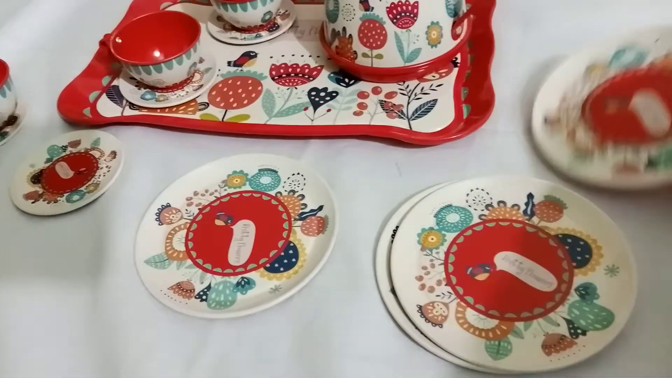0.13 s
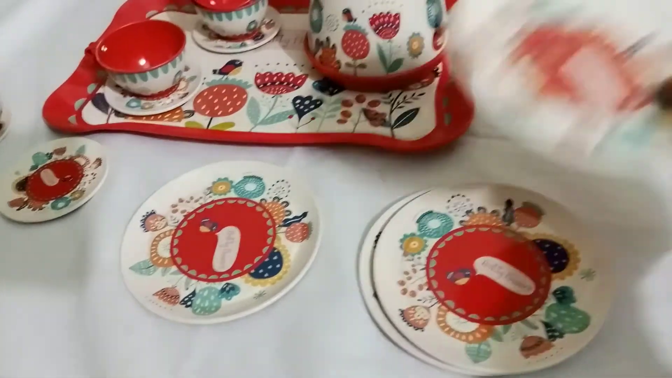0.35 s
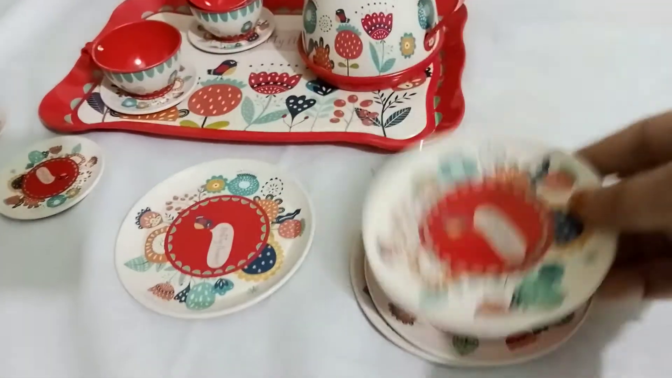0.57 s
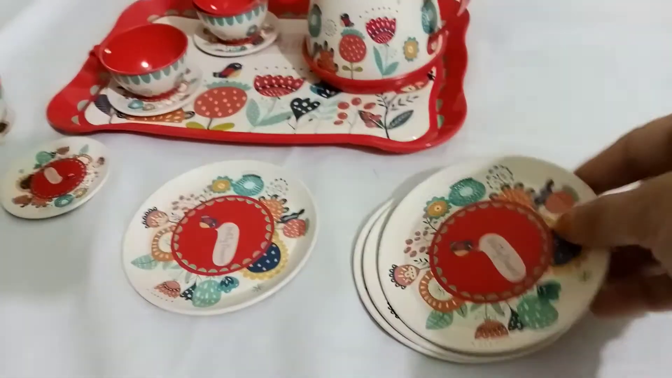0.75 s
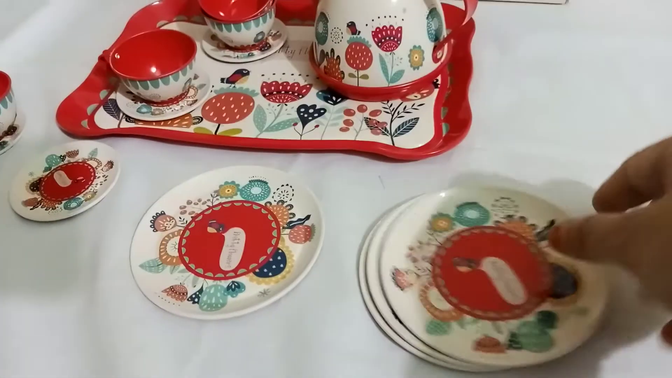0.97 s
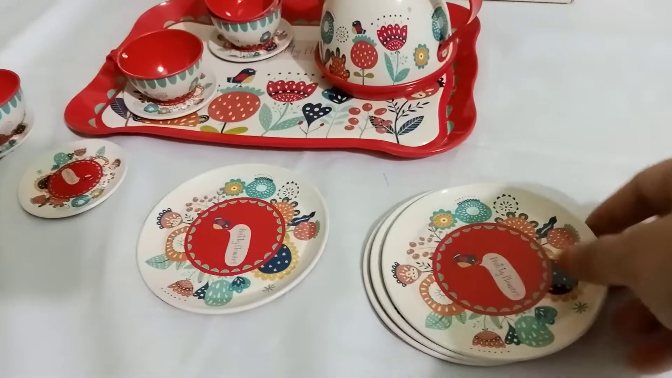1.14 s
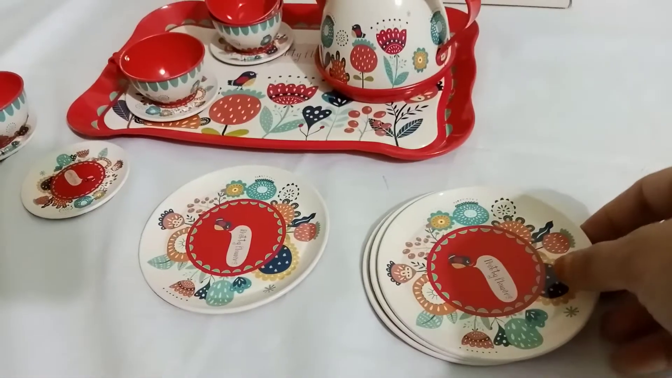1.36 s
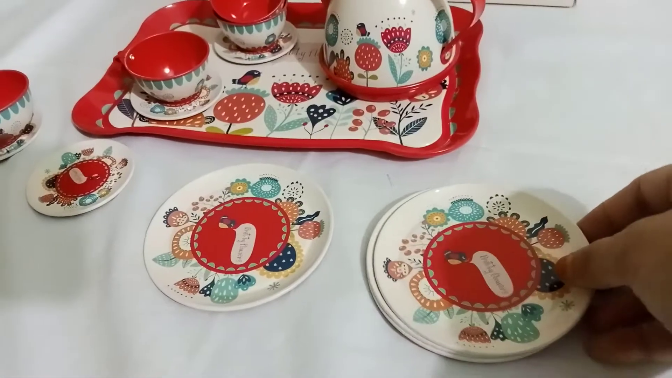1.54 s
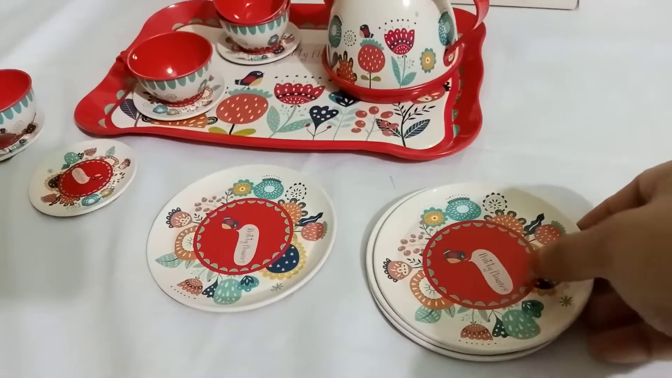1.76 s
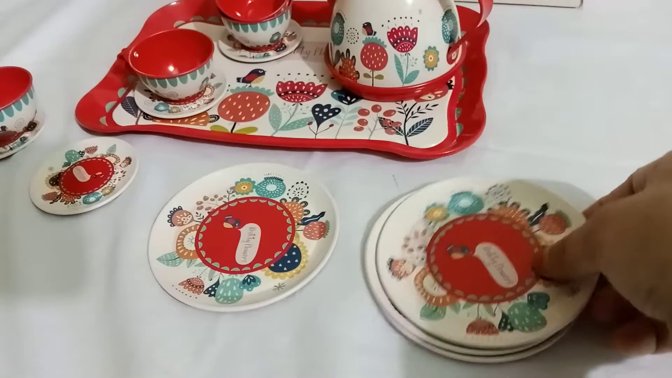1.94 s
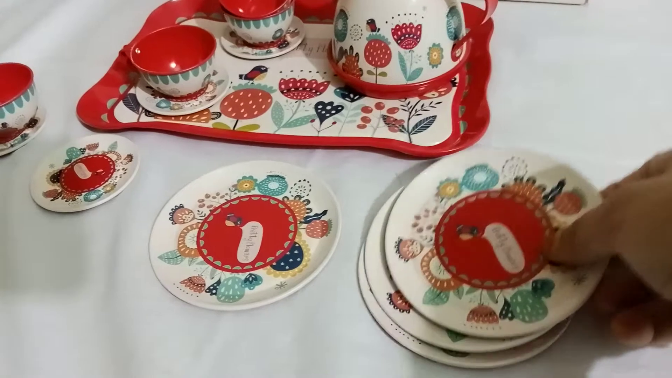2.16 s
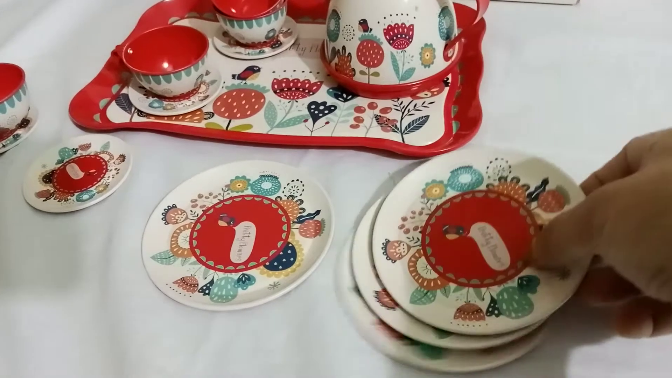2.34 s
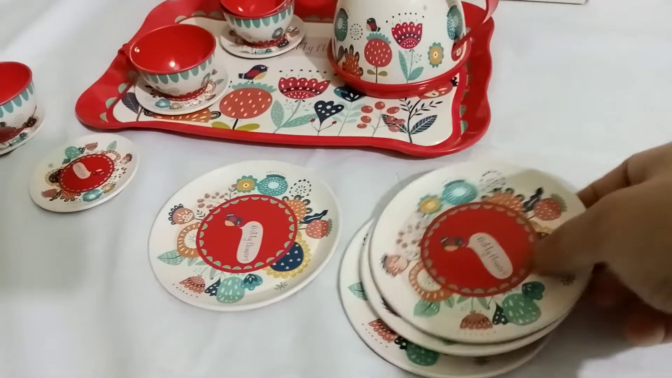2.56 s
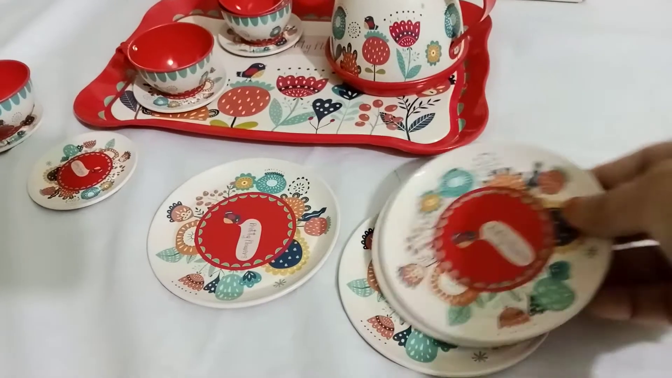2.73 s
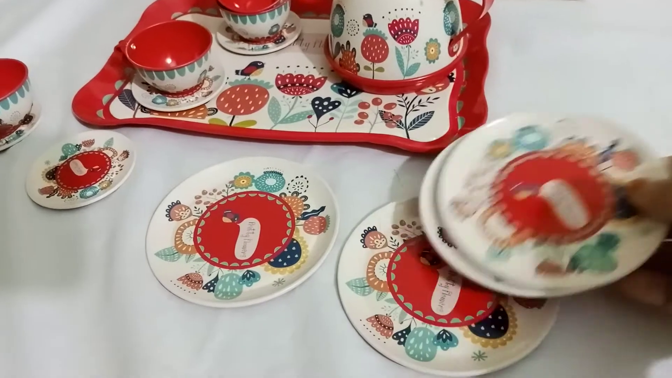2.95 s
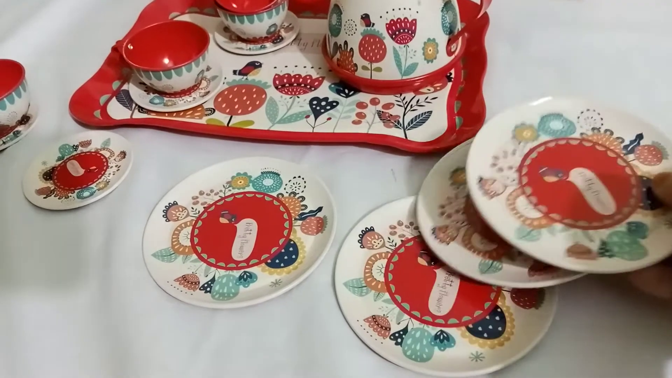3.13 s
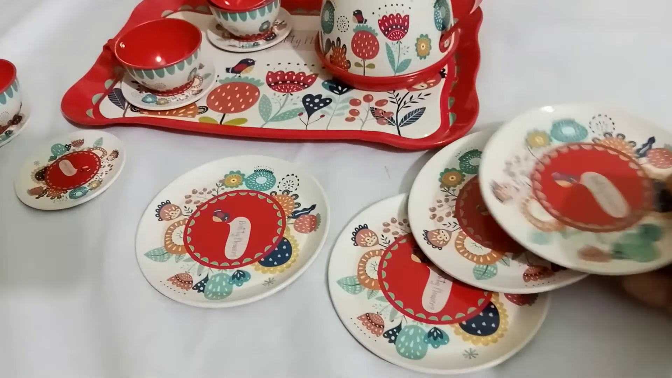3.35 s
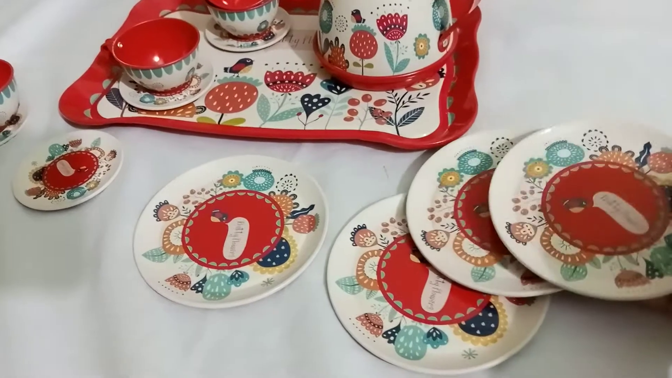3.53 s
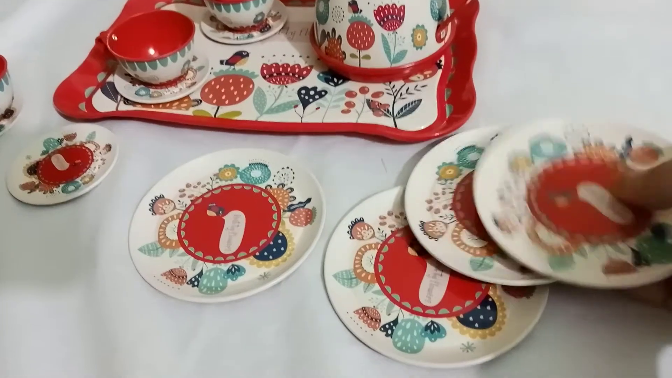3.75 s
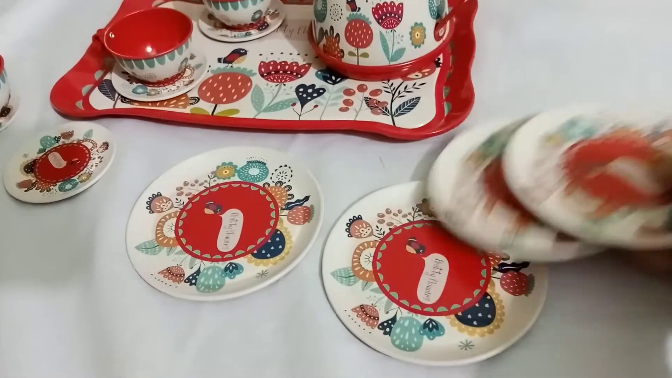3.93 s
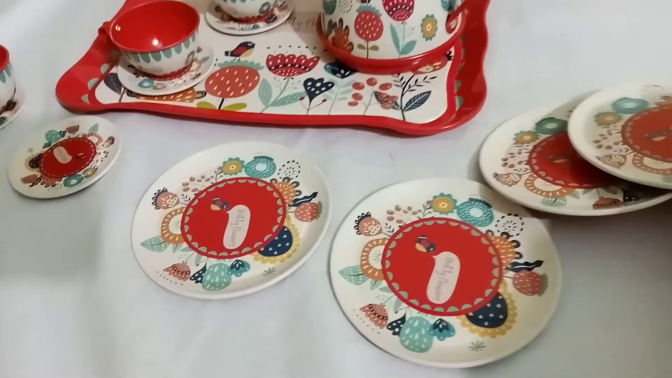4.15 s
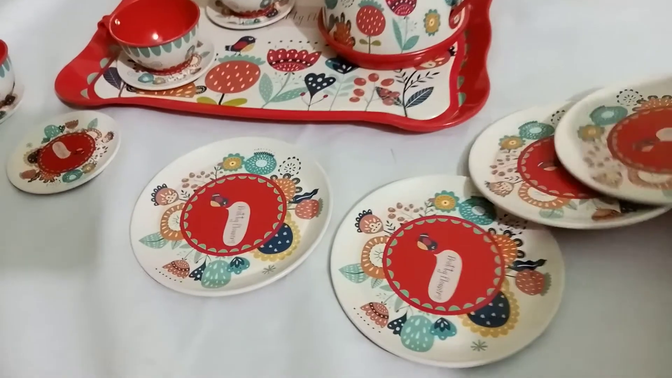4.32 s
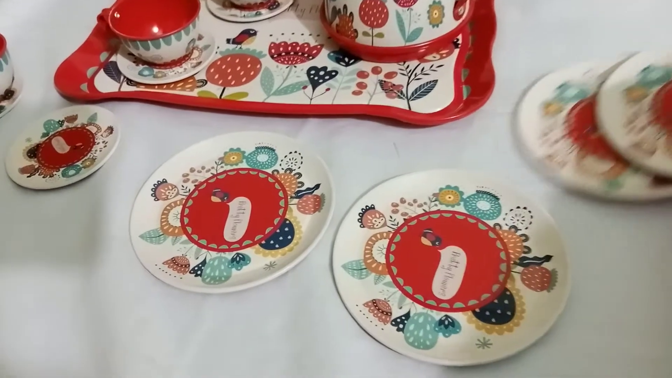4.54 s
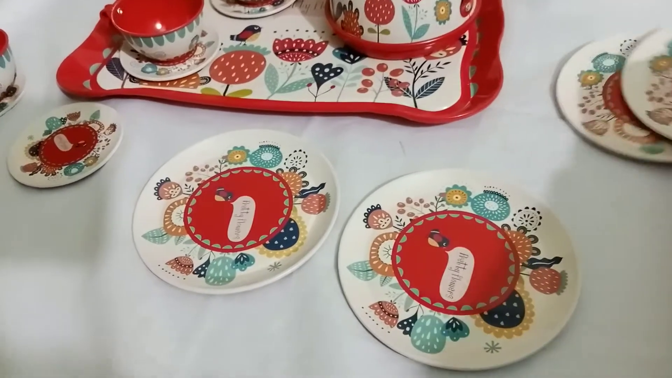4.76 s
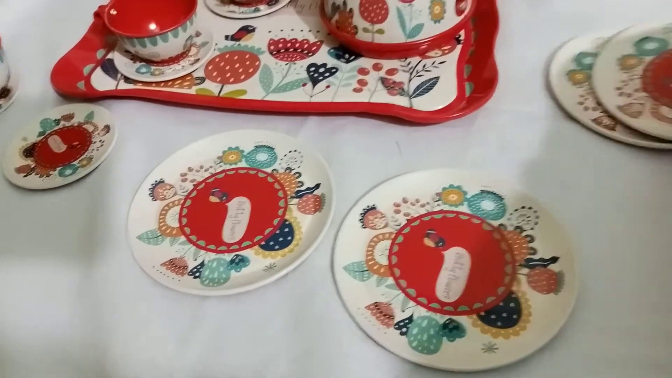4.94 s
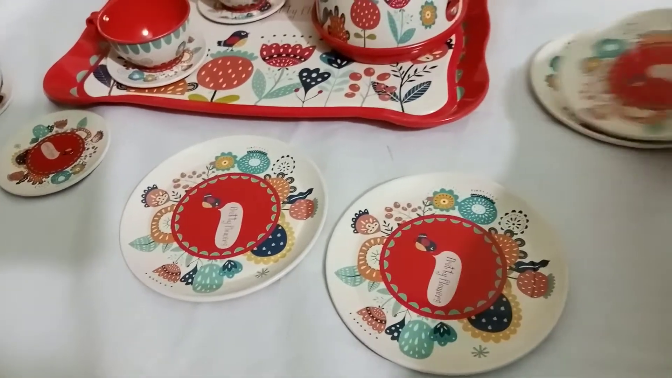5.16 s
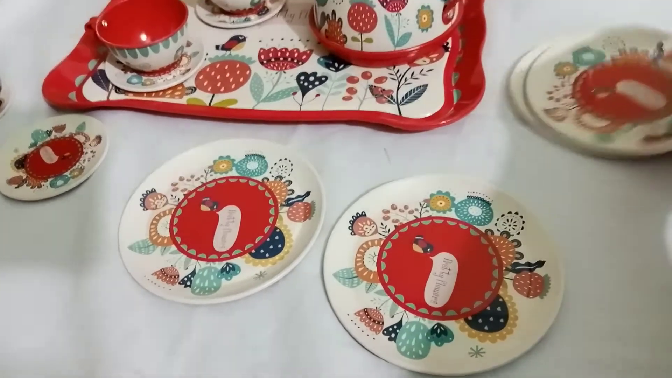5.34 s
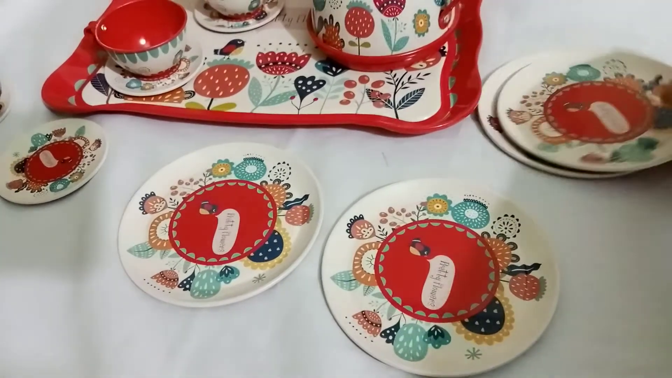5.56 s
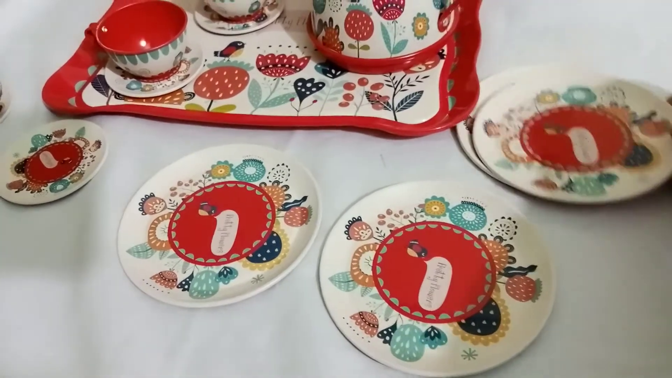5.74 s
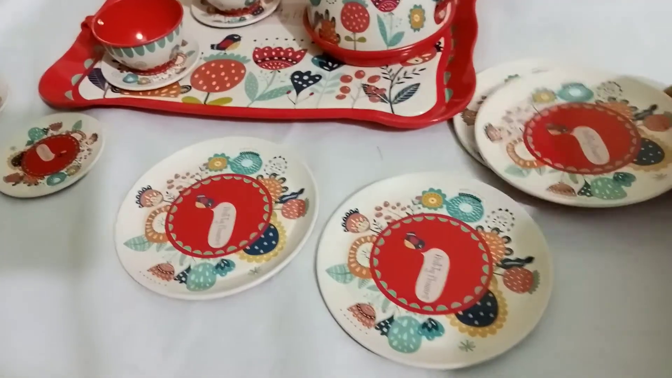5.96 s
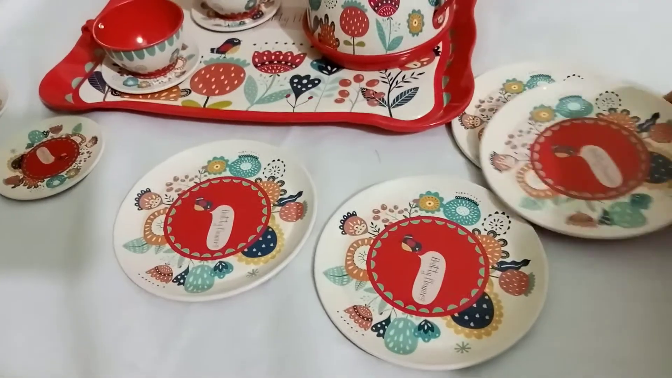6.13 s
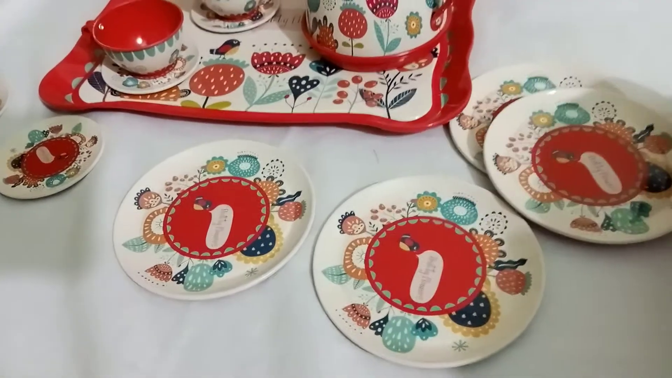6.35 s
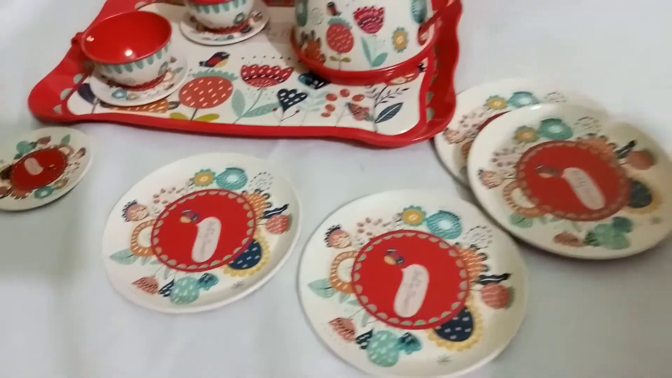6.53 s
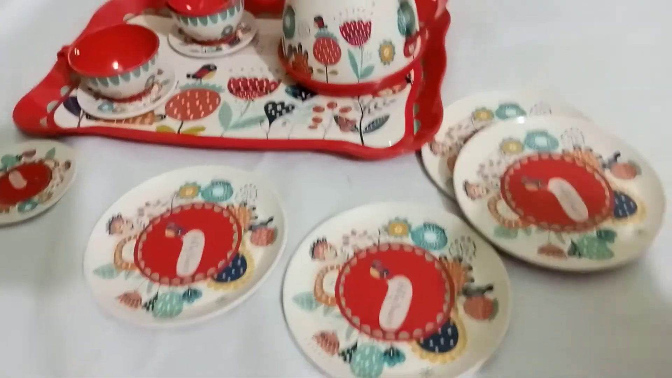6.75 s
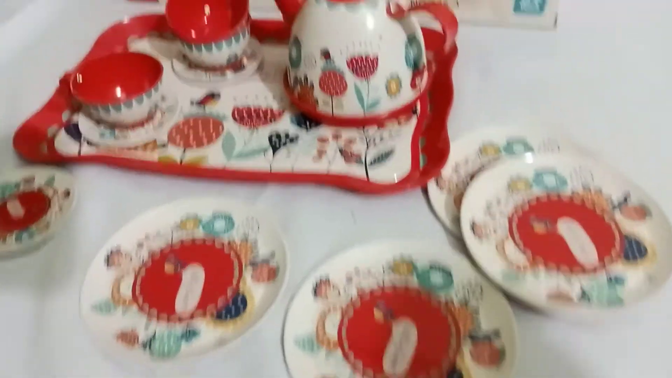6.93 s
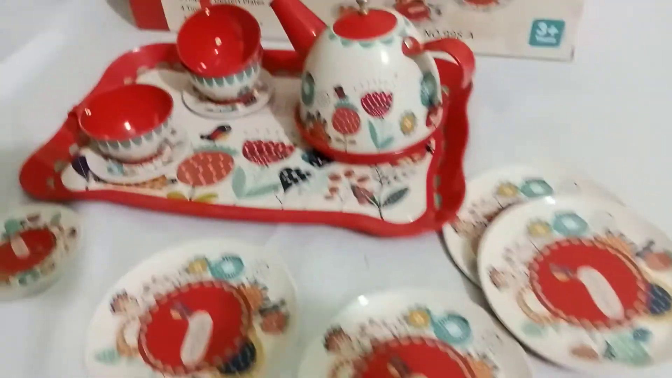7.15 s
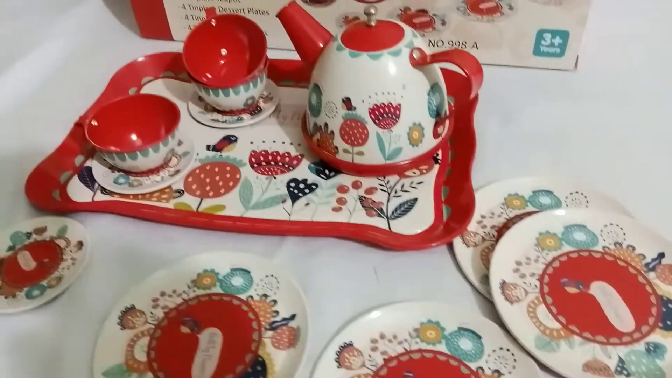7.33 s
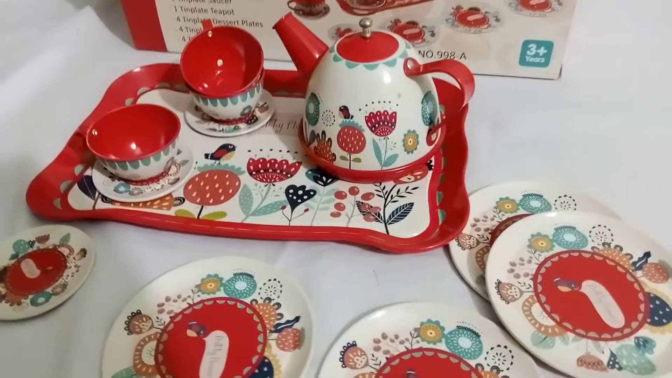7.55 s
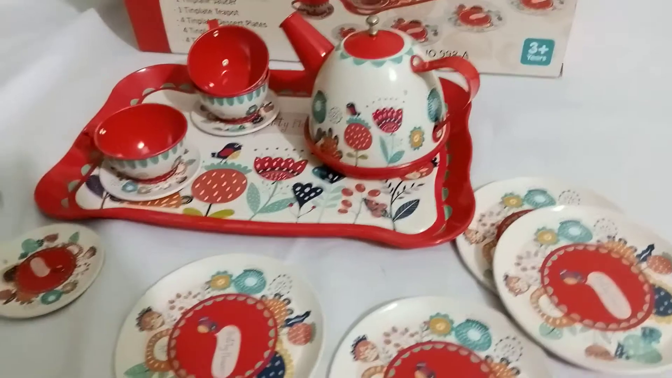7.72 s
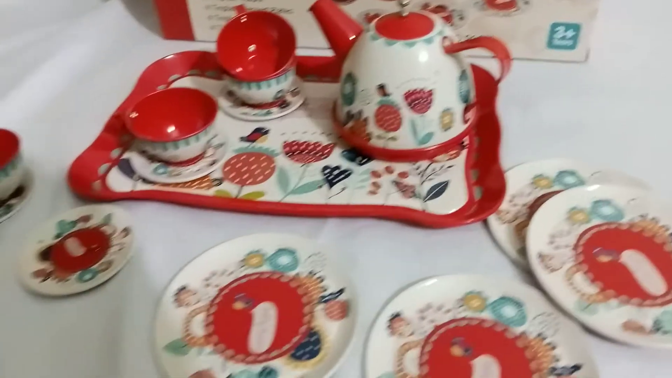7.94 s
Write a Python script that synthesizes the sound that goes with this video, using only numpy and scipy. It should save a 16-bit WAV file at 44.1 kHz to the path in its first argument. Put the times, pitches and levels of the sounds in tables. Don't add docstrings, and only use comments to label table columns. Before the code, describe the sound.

Close, bright metallic clinks of light toy plates, each a crisp crack with a short shimmering ring and quick rattling rebounds. They come in uneven groups: two loud drops early, a busy run of scrapes and knocks midway, a gap, then a few last clinks. Soft low air puffs accompany the hand. Steady hiss and a quiet fan lie beneath, with slight small-room reverberation.

```python
import sys
import numpy as np
from scipy import signal
from scipy.fft import rfft, irfft
from scipy.io import wavfile
from scipy.ndimage import uniform_filter1d

SR = 44100
rng = np.random.default_rng(int(sys.argv[2]) if len(sys.argv) > 2 else 0)


def volts_from_db(level):
    exponent = np.asarray(level, float) / 20
    return 10 ** exponent


def waveform_to_disk(signal):
    frames = np.transpose(np.atleast_2d(signal))
    scaled = np.clip(frames, -1, 1) * 32767
    samples = np.round(scaled).astype(np.int16)
    wavfile.write(sys.argv[1], SR, samples)


N = 356769
TOUCH_T = np.arange(2 ** 14) / SR


def evened(x):
    return x / np.sqrt(np.mean(x ** 2) + 1e-20)


def read(points, hz):
    point_hz, value = np.transpose(points)
    return np.interp(np.log(hz + 1), np.log(point_hz + 1), value)


def coloured(x, db):
    return irfft(rfft(x) * volts_from_db(db), len(x))


def add(mix, s, sound):
    part = mix[round(s * SR):][:len(sound)]
    part += sound[:len(part)]


def steady(spectrum, db, sway_db, band=(0, 15800)):
    size = 2 ** 19
    hz = np.fft.rfftfreq(size, 1 / SR)
    inside = (hz >= band[0]) & (hz < band[1])
    noise = coloured(rng.standard_normal(size), np.where(inside, read(spectrum, hz), -120))[:N]
    drift = uniform_filter1d(rng.standard_normal(N), size=6000)
    sway = evened(uniform_filter1d(drift, size=6000))
    return volts_from_db(db + sway_db * sway) * evened(noise)


def fan():
    # (frequency [Hz], density [dB per Hz])
    fan_spectrum = [(18, -74), (30, -44.5), (159, -3), (188, -4), (252, -2.5), (325, -2.5), (377, -8),
                    (487, -7), (653, -13.5), (742, -8.5), (908, -6), (1200, -16), (1410, -12), (2000, -17),
                    (2400, -18.5), (3120, -14), (5280, -120)]
    return steady(fan_spectrum, db=-50, sway_db=0.77, band=(0, 2400))


def hiss():
    # (frequency [Hz], density [dB per Hz])
    hiss_spectrum = [(1410, -34), (2400, -1), (2580, -3), (3040, -5), (4020, -4), (4530, -3), (5820, -2),
                     (6490, -1.5), (7890, -9.5), (11000, -16), (13700, -31), (14900, -18), (15600, -21)]
    return steady(hiss_spectrum, db=-56, sway_db=0.35, band=(2400, 15800))


def stirred_air():
    # (time [s], peak level [dB], half length [s])
    puffs = [(.04, -61, .15), (.22, -60, .1), (.38, -52.5, 0.047), (.72, -58, .05), (.99, -53, .05),
             (1.09, -54, 0.042), (1.26, -53.5, 0.1), (1.8, -63, .12), (2.267, -48.5, 0.052),
             (2.95, -53, 0.043), (3.066, -51, .09), (3.7, -66, .1), (3.89, -48, .07), (3.98, -63, 0.051),
             (4.3, -70, 0.24), (4.46, -63, .05), (7.2, -74, 0.39), (7.8, -68, .1), (8.04, -63, .12)]
    fall_db = 17
    rumble = steady([(15, -35), (35, -21), (60, -9.5), (90, -6.0), (140, -15), (300, -58)], 0, 0.36)
    t = np.arange(0, N / SR, .002)
    level = sum(volts_from_db(db - fall_db * (abs(t - s) / half) ** 1.7) for s, db, half in puffs)
    return rumble * np.interp(np.arange(N) / SR, t, level)


def plate_stacks():
    # (frequency [Hz], level [dB])
    tapped = [(1722, -3), (2336, -18), (2481, -9), (3353, -14), (3606, -11), (3881, -14), (4155, -4),
              (4500, -15), (5291, -14), (5485, -4)]
    tapped_top = [(5738, -8), (5889, -6), (6228, -5), (6777, -17), (6965, -9), (7154, -10), (7348, -9),
                  (7644, -13), (8855, -15), (9313, -17), (9953, -20), (11471, -25), (13124, -31),
                  (14685, -25)]
    dropped = [(1690, -18), (2244, -22), (2476, -16), (2691, -24), (3348, -15), (3569, -15), (3784, -15),
               (4053, -12), (4495, -18), (4748, -11), (5103, -13)]
    dropped_top = [(5743, -5), (5873, -1), (6212, 4), (6782, -6), (7170, -2), (7407, -6), (7520, -7),
                   (7655, -3), (8263, -13), (8796, -14), (9318, -10), (11794, -22), (13205, -27),
                   (14739, -24)]
    gripped = [(3566, -10), (5593, 0), (5862, -1), (7171, -8), (7432, -13), (7663, -7)]
    tilted = [(1830, -10), (2067, -13), (2277, -8), (2767, -18), (3612, -13), (4048, -6), (4177, -4),
              (4317, -9), (4667, -9), (4952, -11), (5614, 0)]
    tilted_top = [(5792, 2), (5883, -2), (6002, 0), (6147, -5), (7019, -11), (7186, -14), (7611, -12),
                  (7773, -15), (8247, 1), (9318, -16), (9738, -20), (11983, -23), (13345, -27),
                  (14976, -23)]
    fanned = [(1744, -17), (2174, -9), (2379, -21), (2530, -16), (3628, -8), (4193, -9), (4705, -2),
              (4877, -4), (5114, -8), (5275, -10), (5539, -7)]
    fanned_top = [(5776, -10), (5932, 1), (6223, -1), (6772, -12), (7009, -11), (7240, -9), (7617, -9),
                  (7741, -7), (8252, -5), (8855, -13), (9366, -10), (11008, -21), (13452, -30),
                  (14960, -23)]
    lifted = [(2481, -9), (4091, 2), (4344, -9), (4710, 2), (5356, -7)]
    lifted_top = [(5717, -10), (5986, -1), (6185, -5), (6433, -11), (6836, -3), (7159, -6), (7558, -3),
                  (9350, -14), (9506, -18), (10680, -24), (11644, -27), (12936, -37), (14723, -26)]
    pinched = [(1943, -29), (2260, -26), (2395, -9), (2487, -9), (3655, -14), (4053, -6), (4172, -9),
               (4338, 0), (4758, -3), (5259, -15), (5598, -12)]
    pinched_top = [(5738, 5), (6013, -3), (6223, -6), (7003, -11), (7337, -5), (7472, -9), (7585, -5),
                   (7681, -1), (8274, -10), (8882, -14), (9555, -24), (11444, -27), (13539, -35),
                   (15310, -18)]
    freed = [(1722, -15), (2067, -27), (2287, -25), (2815, -24), (3278, -21), (4312, -1), (4667, -13),
             (4748, -13), (5297, -15), (5490, -9), (5593, -15)]
    freed_top = [(5873, -3), (5970, -9), (6206, -5), (6788, -11), (7299, -2), (7552, -11), (7725, -20),
                 (7929, -20), (8801, -12), (9786, -17), (9872, -14), (11444, -26), (13339, -28),
                 (15153, -24)]
    slid = [(1722, -3), (2287, -9), (2772, -16), (2885, -7), (3768, -17), (4317, -12), (4521, -10),
            (4748, 0), (4861, -9), (4974, -9), (5560, -8)]
    slid_top = [(5883, 2), (5975, 0), (6223, 1), (7132, -2), (7310, -3), (7681, -4), (8833, -23),
                (9458, -20), (11590, -29), (11929, -32), (13086, -34), (15643, -29)]
    pulled = [(1722, -7), (2228, -28), (2847, -21), (3003, -17), (3159, -20), (3343, -17), (3854, -22),
              (4640, -17), (4748, -12), (5415, -12), (5647, -17)]
    pulled_top = [(5873, -12), (6228, -1), (6352, -16), (6476, -15), (6793, -24), (7348, -14), (7552, -20),
                  (7671, -24), (8263, -24), (8866, -27), (9867, -26), (10104, -29), (13404, -43),
                  (15622, -30)]
    ticked = [(4290, 0), (6210, -4), (7600, -8), (9450, -11), (13300, -21)]
    squared = [(2497, -25), (4182, -13), (4295, -14), (4570, -15), (4726, -14), (5227, -13), (5329, -11),
               (5566, -10)]
    squared_top = [(5813, -15), (5970, -1), (6212, 0), (6325, -17), (7299, -12), (7563, -23), (7655, -9),
                   (7859, -18), (9436, -15), (9776, -17), (9872, -20), (11670, -27), (13377, -33),
                   (15600, -20)]
    laid = [(1722, -22), (2395, -19), (2610, -33), (3499, -26), (3639, -27), (4134, -22), (4355, -16),
            (4688, -18), (5286, -20), (5480, -11)]
    laid_top = [(5797, -5), (5878, 5), (5975, 4), (6223, -3), (6793, -14), (7035, -10), (7321, -9),
                (7665, -15), (8780, -24), (9313, -21), (10438, -31), (11606, -33), (13129, -36),
                (14588, -30)]
    let_go = [(2330, -29), (2487, -26), (2643, -27), (2847, -15), (3289, -27), (3714, -26), (4333, -16),
              (4705, -16), (5130, -23), (5291, -20), (5528, -19)]
    let_go_top = [(5803, -14), (5883, -15), (5986, -11), (6250, 4), (6793, -15), (7046, -16), (7310, -14),
                  (7558, -12), (8257, -22), (8807, -26), (9307, -20), (11617, -30), (13259, -34),
                  (14852, -30)]
    return [(tapped + tapped_top, .42, .6, .1), (dropped + dropped_top, .32, 1.6, 1.6),
            (gripped, .14, .1, 1.1), (tilted + tilted_top, .22, 3, .1),
            (fanned + fanned_top, .24, 3, 4.4), (lifted + lifted_top, .31, 3, -7),
            (pinched + pinched_top, .16, 4, -5), (freed + freed_top, .38, 3.6, 4.8),
            (slid + slid_top, .31, 3, -1), (pulled + pulled_top, .25, 5, 1.2),
            (ticked, .08, .1, -7), (squared + squared_top, .21, .6, 1.3),
            (laid + laid_top, .29, 2.5, 1.9), (let_go + let_go_top, .39, 1.5, .1)]


def voices(modes, faint_t60):
    f, db = np.transpose(modes)[:, :, None]
    radiated = np.clip(0.42 * volts_from_db(db), 0, .8)
    ring_t60 = faint_t60 * (1 - radiated) / (1 + (f / 16000) ** 2)
    phase, apart = rng.random((2, 2, 30, 1))[:, :, :len(modes)]
    heights = volts_from_db(db - [[[0]], [[9]]])
    pitch = f * (1 + 0.011 * (apart - .5) * [[[0]], [[1]]])
    dying = volts_from_db(-60 * (TOUCH_T / (.72 * ring_t60)) ** 1.6 - 3)
    turn = np.float32(2 * np.pi * ((pitch * TOUCH_T + phase) % 1))
    level = np.float32(heights * dying / np.linalg.norm(heights))
    waves = level * (np.cos(turn) + 1j * np.sin(turn))
    return pitch.ravel(), waves.reshape(pitch.size, -1)


def touch(peak_db, bass_db, treble_db, t60, ring_db, modes, clear_db, ring):
    # (frequency [Hz], density [dB per Hz])
    crack_spectrum = [(650, -45), (1100, -30), (1620, -22.5), (2730, -24), (3760, -14.5), (4350, -3),
                      (5220, -2), (6120, 5.5), (7600, -3.5), (8420, -14.5), (10200, -14.5), (12400, -25.5),
                      (15200, -15), (15700, -20), (16700, -71)]
    # (frequency [Hz], level [dB])
    rim_modes = [(8800, 6.5), (9500, 6), (10400, 9.5), (11600, 7.5), (13300, 6), (15000, 7)]
    t = TOUCH_T
    hz = np.fft.rfftfreq(len(t), 1 / SR)
    f, db = np.transpose(modes)[:, :, None]
    tilt_db = read([(2500, bass_db), (4000, 0), (8000, 0.012), (11000, treble_db)], hz)
    tilt_db += read(crack_spectrum, hz)
    lift_db = np.clip(db - read(crack_spectrum, f) + 13.0 + clear_db, 0, 13 + clear_db)
    humps_db = np.max(lift_db / (1 + ((hz - f) / 130) ** 2), axis=0)
    humps_db += sum(rim_db / (1 + ((hz - rim_hz) / 180) ** 2) for rim_hz, rim_db in rim_modes)
    many = evened(coloured(rng.standard_normal(len(t)), tilt_db + humps_db))
    pressed = volts_from_db(-60 * (t / max(t60, .008)) ** 1.115)
    first_tick = 0.22 * np.exp(-t / 0.00058)
    crack = 0.35 * many * (pressed + first_tick)
    shimmer = many * volts_from_db(-5 - 1.1 * clear_db - 60 * t / 0.5)
    free_ring = (ring + shimmer) * np.cos(np.pi / 2 * t / t[-1])
    rise = 1 - np.exp(-(t / .0006) ** 2)
    return volts_from_db(peak_db) * rise * (crack + volts_from_db(ring_db) * free_ring)


def plates():
    # (time [s], peak [dB], bass [dB], crack t60 [s], ring [dB])
    blows = [(0.727, -7.5, -2, 0.038, -24), (0.991, -5.5, 5, 0.043, -14.5), (2.2024, -26, 17, 0.046, -21),
             (2.4443, -11.5, 8, 0.056, -20.5), (2.5306, -14, 8.5, 0.095, -14),
             (2.826, -14.5, 6, 0.035, -27), (3.0655, -11, 9, 0.016, -29), (3.1329, -8, -5, 0.031, -13),
             (3.8479, -14.5, 8, 0.041, -21.5), (4.1732, -10.5, 4.5, 0.042, -19),
             (5.5788, -24.5, 16, 0.028, -22), (5.748, -11.5, 7, 0.046, -30),
             (6.2112, -10, 2.5, 0.056, -10.5), (6.3219, -8, -2.5, 0.065, -9.5)]
    # (time [s], peak [dB], bass [dB], treble [dB], ring [dB])
    rebounds = [(0.7466, -20.5, 5, 5, -9), (0.7522, -24, 19, 4, -14), (1.0076, -14, 6, -5, -21),
                (1.0195, -14.5, -2, 5, -29), (1.0385, -14, 9, 3, -32), (1.0584, -15, 10, -2, -18),
                (2.4614, -31.5, 21.5, -2, -5), (2.5574, -18.5, 11, -19, -23), (2.5727, -21, 9, -3, -25),
                (3.0716, -22.5, 12.5, -6, -8), (3.164, -24, 7, 0, -7), (3.8917, -29, 16, -7, -19.5),
                (4.1772, -8, 1.5, -1.5, -21), (4.1925, -15, 3, -8, -18), (5.755, -21.5, 10.5, 0.1, -18),
                (6.3327, -16, 1, 0, -28), (6.3744, -19.5, 9, 2, -22)]
    # (time [s], peak [dB], bass [dB])
    grazes = [(0.9835, -23, 6), (2.052, -34, 3), (2.0924, -43, 0), (2.1005, -29, 22), (2.1805, -39, 2),
              (2.3466, -45, 0), (2.3968, -27.5, 12), (2.7776, -41, -14), (2.7995, -30, -6),
              (2.8124, -43, -2), (2.8622, -29, -6), (2.8877, -30.5, 7), (3.5703, -42, -2),
              (4.1632, -21, 16), (4.315, -27.5, -6), (4.379, -40, 2), (4.4694, -44, -11), (4.4887, -38, -3),
              (4.5046, -37, 4), (4.5196, -30, 1), (4.53, -28, 4), (5.964, -32, 15)]
    # (time [s], peak [dB], t60 [s])
    knocks = [(0.7303, -3, 0.021), (1.022, -13, 0.02), (1.0713, -8.5, 0.043), (2.5332, -10, .016),
              (2.5362, -13, .022), (3.0735, -11, 0.017), (3.1348, -7, .022), (3.893, -23, .018),
              (4.1843, -12, .018), (5.756, -14.5, 0.019), (6.2171, -11, 0.028), (6.328, -12, .018)]
    stacks = plate_stacks()

    # (time [s], peak [dB], bass [dB], treble [dB], crack t60 [s], ring [dB])
    touches = []
    for (s, db, bass, t60, ring), stack in zip(blows, stacks):
        touches.append((s, db, bass, stack[-1], t60, ring))
    for s, db, bass, treble, ring in rebounds:
        touches.append((s, db, bass, treble, 0.0083 - 0.0069 * ring, ring))
    for s, db, bass in grazes:
        touches.append((s, db, bass, -1, 0.055, -43.5 - 0.5 * db))
    for s, db, t60 in knocks:
        touches.append((s, db, -5, 2, t60, -43))

    out = np.zeros(N)
    blows_s = np.transpose(blows)[0]
    rings = [voices(modes, faint_t60) for modes, faint_t60, _, _ in stacks]
    lead = .0008
    for s, *how in sorted(touches):
        k = np.argmin(abs(blows_s - s))
        modes, _, clear_db, _ = stacks[k]
        pitch, waves = rings[k]
        in_step = np.exp(2j * np.pi * pitch * round((s - lead) * SR) / SR).astype(waves.dtype)
        add(out, s - lead, touch(*how, modes, clear_db, (in_step @ waves).imag))
    return out


def room(x, wet_db=-12):
    # (frequency [Hz], t60 [s])
    reverberation = [(1000, 0.78), (3000, 0.96), (6000, 0.44), (10000, 0.53), (16000, 0.28)]
    # (delay [s], level [dB])
    echoes = [(.0026, -18), (.0047, -22), (.009, -24), (.014, -24)]
    taps = np.zeros(SR)
    at = np.arange(400, SR - 20, 20)
    taps[at + rng.integers(0, 20, len(at))] = rng.choice([-1., 1.], len(at))
    hz, t, z = signal.stft(taps, SR, nperseg=256)
    decay = volts_from_db(-60 * t / read(reverberation, hz)[:, None])
    tail = signal.istft(z * decay, SR, nperseg=256)[1]
    tail *= volts_from_db(wet_db) / np.linalg.norm(tail)
    for s, db in echoes:
        tail[round(s * SR)] += volts_from_db(db)
    return x + signal.fftconvolve(x, tail)[:N]


def rustle():
    # (time [s], level [dB])
    brushing = [(6.7, -73), (6.85, -64), (7.0, -63), (7.15, -66), (7.35, -85)]
    level_db = np.interp(np.arange(N) / SR, *np.transpose(brushing), -120, -120)
    return steady([(3000, -30), (7000, 8), (10000, -3), (15000, -9)], level_db, 1.5)


def scene():
    background = fan() + hiss() + stirred_air() + rustle()
    return (room(plates()) + background)[None]


def top_cut(x):
    return signal.sosfilt(signal.butter(12, 16810, fs=SR, output="sos"), x)


def record(dry):
    power = uniform_filter1d(dry[0] ** 2, size=2000, origin=999)
    power_db = 10 * np.log10(abs(power) + 1e-12)
    excess_db = np.maximum(power_db + 37.5, 0)
    over_db = signal.lfilter([1 / 2500], [1, 1 / 2500 - 1], excess_db)
    controlled = dry / volts_from_db(.09 * over_db)
    rounded = .6 * np.tanh(controlled / .6)
    finished = signal.oaconvolve(rounded, signal.firwin(255, 16750, fs=SR)[None], "same")
    return top_cut(finished)


dry = scene()
out = record(dry)
waveform_to_disk(out)
```